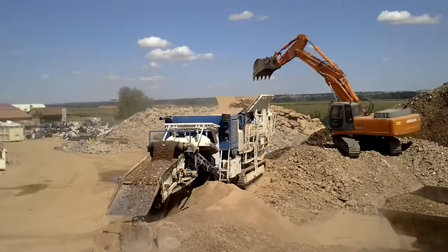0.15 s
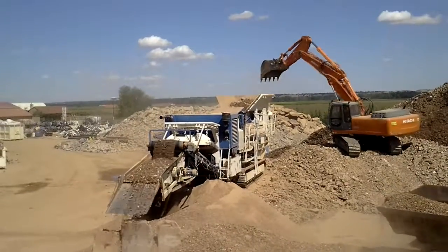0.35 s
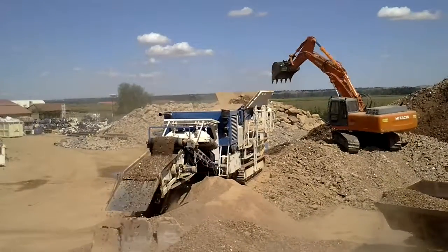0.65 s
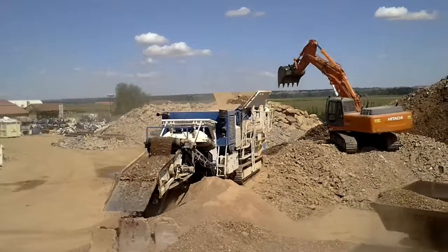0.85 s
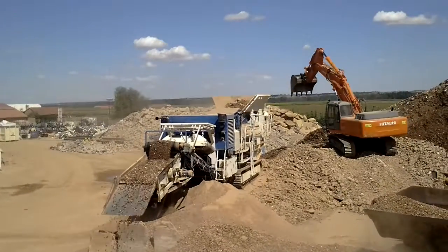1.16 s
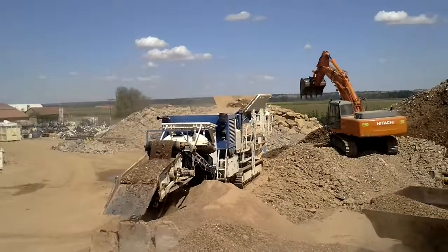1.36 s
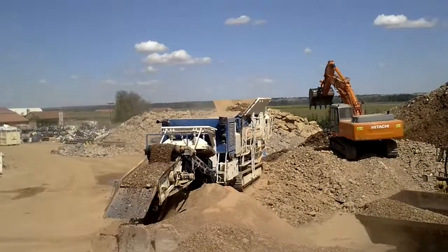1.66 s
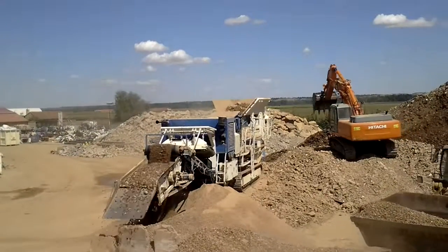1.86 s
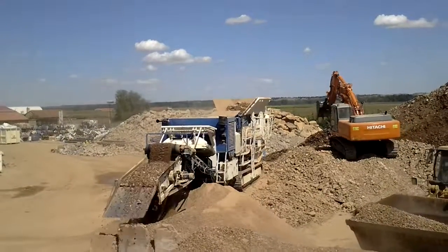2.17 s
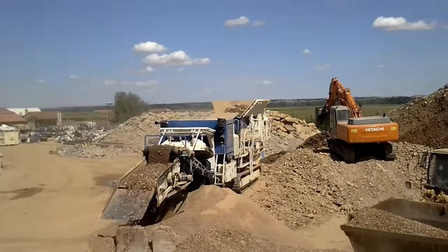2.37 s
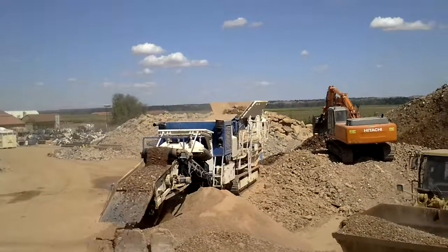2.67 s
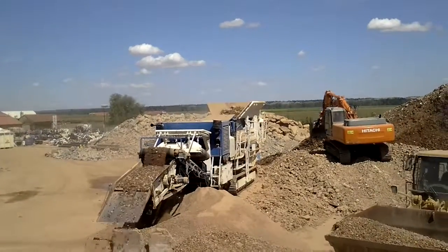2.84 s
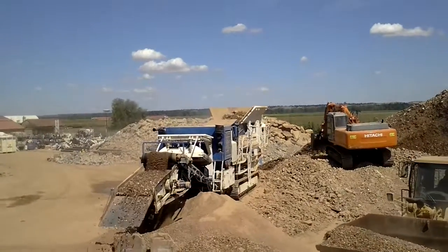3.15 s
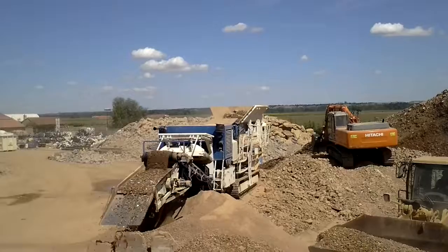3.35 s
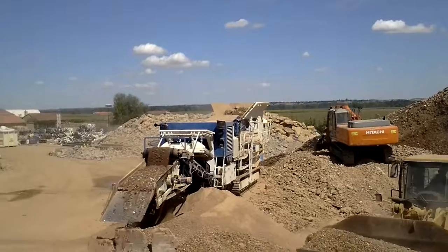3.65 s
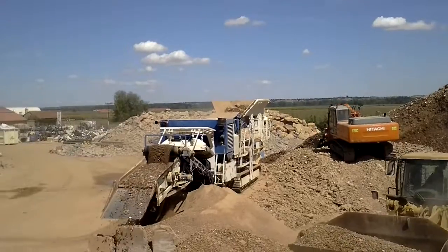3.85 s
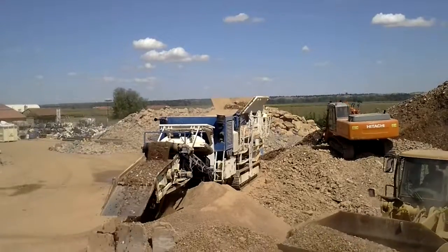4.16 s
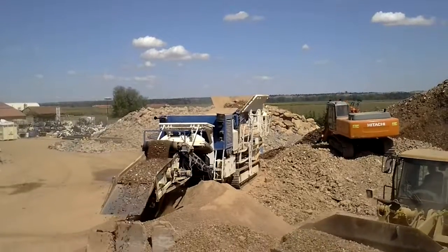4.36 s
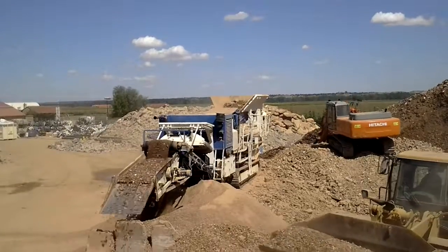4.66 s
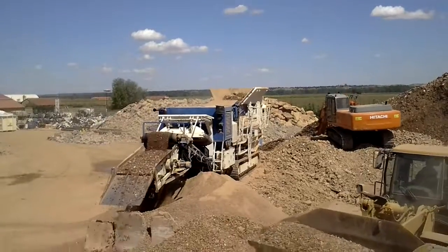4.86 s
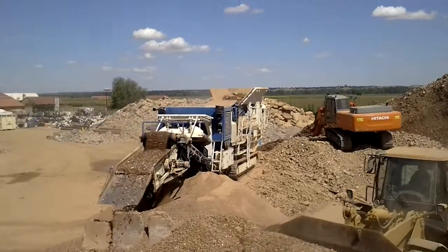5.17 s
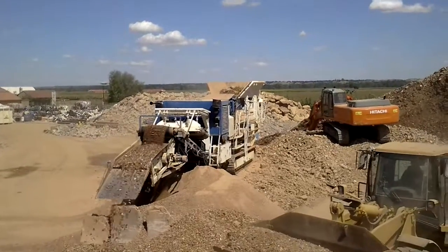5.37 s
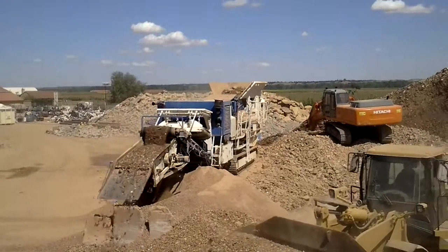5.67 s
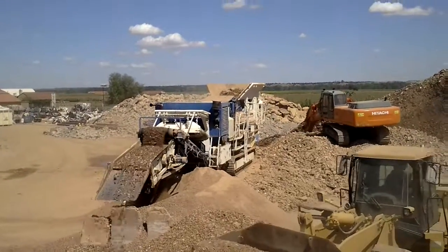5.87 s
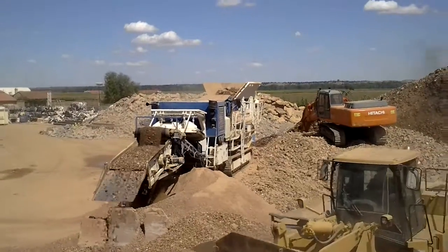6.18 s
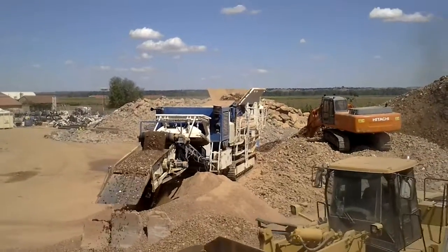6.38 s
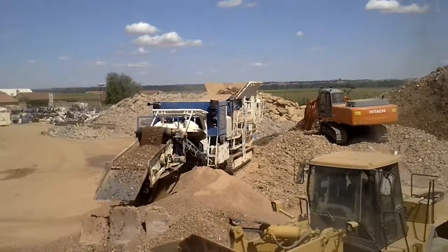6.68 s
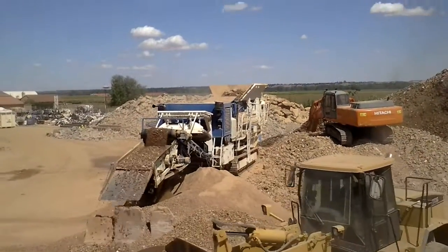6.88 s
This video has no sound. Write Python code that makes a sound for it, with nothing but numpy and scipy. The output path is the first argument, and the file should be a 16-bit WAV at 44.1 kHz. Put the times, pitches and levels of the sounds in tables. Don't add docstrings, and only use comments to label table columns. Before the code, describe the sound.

Steady diesel drone and gear whine under dense stone rattle, hard clacks and dull hopper thumps, with a nearing loader engine and late pump whine.

```python
import sys
import numpy as np
from scipy import signal
from scipy.fft import rfft, irfft
from scipy.io import wavfile
from scipy.ndimage import uniform_filter1d

SR = 44100
rng = np.random.default_rng(int(sys.argv[2]) if len(sys.argv) > 2 else 0)


def transcribe(signal):
    frames = np.atleast_2d(signal).T
    limited = np.clip(frames, -1, 1)
    pcm = np.round(limited * 32767).astype(np.int16)
    wavfile.write(sys.argv[1], SR, pcm)


def gain_from_decibels(decibels):
    exponent = np.asarray(decibels, float) / 20
    return 10 ** exponent


N = 309582
T = np.arange(N) / SR
SLOW = T[::10]
CYCLE_HZ = 13.597
SHADE_HZ = 780

# (time [s], firing rate [Hz], exhaust level [dB], nearness [0-1])
LOADER_PATH = [(0.0, 82, -55.5, 0.5), (1.3, 81.94, -53.5, 0.01), (2.1, 73.1, -52, 0.3), (3.1, 68.9, -43, 0),
               (3.9, 62.3, -50.5, 0.4), (4.499, 52.26, -56, 0.5), (4.901, 52.7, -53, 0.63),
               (5.1, 60.7, -36.5, 0.75), (5.3, 68.8, -45, .7), (5.5, 77.6, -42, 0.6),
               (5.8, 84.2, -46.5, 0.6), (6.099, 89.2, -56.5, .8), (6.499, 89.7, -49, 0.8),
               (7.0, 97, -46.5, 0.84)]
# (frequency [Hz], density [dB per Hz])
DECK_SPECTRUM = [(1500, -20), (2250, -9), (2620, -0.5), (2980, -5.5), (3500, -0.5), (3830, -5), (4050, -4),
                 (4300, -10.5), (4700, -12.5), (5350, -17.5), (5650, -19), (6500, -24), (7000, -27),
                 (7500, -47), (8200, -97.5)]


def evened(x):
    return x / np.sqrt(np.mean(x ** 2) + 1e-20)


def read(points, hz):
    f, value = np.transpose(points)
    return np.interp(np.log(hz + 1), np.log(f + 1), value)


def bump(x, middle, width):
    return np.exp(-.5 * ((x - middle) / width) ** 2)


def add(mix, s, sound):
    part = mix[round(s * SR):][:len(sound)]
    part += sound[:len(part)]


def waver(top_hz, t):
    coarse = np.arange(0, N / SR + .01, .005)
    hz = np.geomspace(top_hz / 20, top_hz, 16)[:, None]
    sines = np.sin(2 * np.pi * (hz * coarse + rng.random((16, 1))))
    return np.interp(t, coarse, evened(sines.sum(0)))


def tone(turns, db, waver_db, blur):
    level = np.sqrt(2) * gain_from_decibels(db + waver_db * waver(5, SLOW))
    return level * np.cos(2 * np.pi * turns + blur * waver(6, SLOW))


def ringing(hz):
    # (mode frequency [Hz], bandwidth [Hz], gain [dB])
    panels = [(580, 14, -3.5), (5070, 130, -3), (1545, 28, 1.5), (1647, 27, 3.5), (1838, 13, 7),
              (2142, 14, 6.5), (2615, 99, 2), (3780, 44, 1), (4140, 260, 2.5), (5320, 210, 3),
              (2495, 90, -2.5), (4800, 150, -3), (4925, 90, 2.5), (5580, 120, -4)]
    return 1 + sum((gain_from_decibels(db) - 1) / (1 + (2 * (hz - f) / width) ** 2) for f, width, db in panels)


def shaped(x, spectrum, moving_db, patchy_db, streaky_db):
    fine_hz = np.fft.rfftfreq(N, 1 / SR)
    x = irfft(rfft(x) * gain_from_decibels(read(spectrum, fine_hz)) * ringing(fine_hz), N)
    hz, t, z = signal.stft(x, SR, nperseg=1024, noverlap=768, boundary="even")

    def drift(bins, frames):
        across = uniform_filter1d(rng.standard_normal(z.shape), size=bins, axis=0)
        return evened(uniform_filter1d(across, size=frames, axis=1))

    patches = drift(8, 12)
    streaks = drift(2, 60)
    z = z * gain_from_decibels(moving_db(np.log2(hz + 1)[:, None], t) + patchy_db * patches + streaky_db * streaks)
    return evened(signal.istft(z, SR, nperseg=1024, noverlap=768)[1][:N])


def nearness(t):
    s, *_, near = np.transpose(LOADER_PATH)
    return np.interp(t, s, near)


def shade_db(octave, t):
    return -13 * np.maximum(nearness(t) - .75, 0) * bump(octave, np.log2(SHADE_HZ), .45)


def groan_db(octave, t):
    # (middle time [s], length [s], gain [dB], pitch of the part [Hz])
    loads = [(0.8, 3.2, 3, 1310), (6.7, 1.2, -3.5, 1320), (6.8, .7, 5, 980), (4.0, 1.4, 4, 440),
             (3.5, 0.92, 2, 600), (0.6, 1.5, 4, 210), (5.4, .6, 2, 1060), (4.3, .6, -2, 950),
             (6.5, .4, 3, 1600), (5.3, .8, 2, 1650), (1.0, 2.4, -1.5, 1040), (3.2, .7, 0.5, 240),
             (2.5, .5, -3, 550), (4.9, .4, -3, 270), (6.5, .5, -3, 230)]
    return sum(db * bump(t, s, length / 2) * bump(octave, np.log2(hz), .07) for s, length, db, hz in loads)


def crusher_hum():
    # (time [s], whine frequency [Hz], whine level [dB])
    drive = [(0.0, 746.4, -29.5), (0.9, 746.6, -29.5), (1.9, 747.2, -28.5), (2.7, 746.6, -29),
             (3.9, 745.8, -31), (4.6, 745.6, -29), (5.3, 745.1, -29.5), (6.3, 743.8, -32),
             (7.0, 742.8, -33)]
    # (order of the four-stroke cycle [1], level [dB])
    engine_orders = [(4, -56), (6, -61.5), (7, -59), (8, -59), (12, -54.5), (13, -46.5), (14, -38),
                     (15, -48), (16, -48), (20, -46.5), (22, -43), (23, -47.5), (24, -36.5), (25, -42.5),
                     (26, -38), (27, -38), (28, -38), (29, -45.5), (30, -41), (31, -46), (34, -44),
                     (36, -46), (38, -50), (40, -48), (42, -45.5), (43, -49), (44, -43.5), (46, -45.5),
                     (47, -43.5), (48, -43)]
    # (frequency [Hz], level [dB])
    shaft_tones = [(33, -61), (35.7, -53.5), (44.4, -58), (296.1, -36.5), (362, -43), (429.3, -45),
                   (500.6, -48), (565, -46), (704, -42.5), (795, -43), (927, -44), (1138, -48),
                   (1247.6, -47), (1285, -42), (1339, -44.5), (1393.6, -50), (1580, -46), (1851, -51)]
    s, whine_hz, whine_db = np.transpose(drive)
    rated_hz = 746.0
    seconds = np.cumsum(np.interp(SLOW, s, whine_hz) / rated_hz) * SLOW[1]
    whine_level = np.interp(SLOW, s, whine_db) - 1.6 + 3.2 * waver(30, SLOW)
    hum = tone(rated_hz * seconds, whine_level, waver_db=.9, blur=0.45)
    for order, db in engine_orders:
        scatter = .1 + .9 * (round(order) % 2) * (order > 16)
        lag = scatter * rng.random()
        hum = hum + tone(round(order) * CYCLE_HZ * seconds + lag, db, waver_db=1.3, blur=0.25)
    for hz, db in shaft_tones:
        shade = 0.58 * shade_db(np.log2(SHADE_HZ), SLOW) * (hz > SHADE_HZ)
        level = db + groan_db(np.log2(hz), SLOW) + shade
        hum = hum + tone(hz * seconds + rng.random(), level, waver_db=3.0, blur=0.69)
    return hum


def loader():
    s, hz, db, _ = np.transpose(LOADER_PATH)
    firing_turns = np.cumsum(np.interp(SLOW, s, hz)) * SLOW[1]
    exhaust = tone(firing_turns, np.interp(SLOW, s, db) - 2.0, waver_db=3.0, blur=.15)
    pump_on = np.clip((SLOW - 6.33) / .15, 0, 1)
    pump = tone(520 * SLOW, -38, waver_db=1.5, blur=.2) * pump_on
    return pump + exhaust


def nearing_db(octave, t):
    fan_db = 9 * nearness(t) * bump(octave, np.log2(2160), 0.2)
    return fan_db + shade_db(octave, t) + groan_db(octave, t)


def roar():
    # (frequency [Hz], density [dB per Hz])
    roar_spectrum = [(27, -52), (34, -22), (60, -21.5), (135, -17), (178, -8), (245, -8.5), (351, -0.5),
                     (513, -11), (736, 0.5), (864, -6.5), (994, -10), (1540, -10), (1960, -20.5),
                     (2400, -26), (3100, -51)]
    wind = gain_from_decibels(-21.5) * shaped(rng.standard_normal(N), roar_spectrum, nearing_db, patchy_db=0.5, streaky_db=1)
    upper = signal.sosfiltfilt(signal.butter(2, [900, 1800], "band", fs=SR, output="sos"), wind)
    lower = signal.sosfiltfilt(signal.butter(2, [270, 450], "band", fs=SR, output="sos"), wind)
    puffs = .17 * lower * np.cos(2 * np.pi * 2 * CYCLE_HZ * T)
    chuffs = .13 * upper * np.cos(2 * np.pi * 4 * CYCLE_HZ * T)
    return wind + puffs + chuffs


def batches_db(octave, t):
    # (middle time [s], length [s], gain [dB], pitch of the
    # part [Hz])
    batches = [(0.089, 1.1, 7.5, 4170), (.25, 0.83, 2.5, 2560), (1.4, 3, -1, 2820), (0.901, 0.35, 0, 4200),
               (2.2, 0.9, 3, 2600), (0.45, 0.27, 1.5, 3320), (0.25, 0.6, 3, 6700), (0.25, 0.4, 2, 6000),
               (1.6, .4, 2.5, 6000), (.65, .3, 3, 5600), (6.2, .3, 3, 5800), (6.25, .25, 2, 5050),
               (6.42, .15, 3, 4500), (2.35, .1, 4, 4900), (1.54, 0.56, 8, 4130), (2.449, 0.89, 3.5, 5440),
               (2.8, 0.16, 3, 3270), (3.323, 0.23, 7.5, 4210), (4.11, 0.61, 2.5, 4990),
               (4.274, 0.57, 3.5, 2690), (4.936, 0.27, 4.5, 2650), (5.039, 0.24, 5, 4520),
               (5.64, 0.2, 4.5, 2770), (5.9, 0.18, 3.5, 3970), (6.173, 0.14, 10.5, 4190),
               (6.19, 0.23, 6.5, 4540), (6.2, 0.48, 5.5, 2900), (6.171, 0.15, 6, 6600),
               (5.7, 0.18, 1.5, 5150), (4.5, 2.4, 0, 4250), (5.7, .15, 2, 4110), (6.73, 0.87, 7, 4200),
               (6.7, .7, 2.5, 3900), (4.994, 1.3, 2, 3390), (4.4, 2, 2.5, 4470), (4.5, 1.8, 2, 5350),
               (4.3, .3, 3, 3500), (2.8, .3, -2, 3000), (6.7, .5, 3.5, 6600), (6.85, .4, 3, 5700),
               (4.6, 1.6, -2, 4330), (5.2, 1.2, 2, 3800)]
    swells = 0
    for s, length, db, hz in batches:
        pitch = np.log2(hz)
        width = 0.12 * np.where(octave < pitch, .5, 1)
        swells = swells + db * bump(t, s, length / 2) * bump(octave, pitch, width)
    echo_oct = 0.058
    comb = bump(octave, np.log2(2860), echo_oct) - bump(octave, np.log2(2500), echo_oct)
    echo_db = 9 * np.clip(nearness(t) - 0.51, 0, .3) * comb
    thinning_db = -6.5 * np.maximum(t - 6.66, 0)
    return swells + echo_db + thinning_db


def rattle():
    clumps = gain_from_decibels(1.0 * waver(40, T))
    sizes = gain_from_decibels(1.8 * np.minimum(rng.exponential(1, N), 4)) * rng.choice([-1., 1.], N)
    blows = sizes * clumps * (rng.random(N) < 2500 / SR)
    blur = rfft(rng.standard_normal(2000) * gain_from_decibels(-60 * T[:2000] / 0.022))
    blur = irfft(blur / abs(blur))
    stones = evened(signal.oaconvolve(blows, blur)[:N]) + 0.92 * rng.standard_normal(N)
    return gain_from_decibels(-27) * shaped(stones, DECK_SPECTRUM, batches_db, patchy_db=0.6, streaky_db=1.1)


def clacks():
    # (time [s], peak level [dB], ring frequency [Hz], relative grit level [dB])
    stones = [(0.4582, -10, 3320, -21), (1.497, -6, 4040, -28.5), (1.5347, -5.5, 4030, -31),
              (1.601, -18, 4000, -16), (1.7314, -11, 4360, -25), (1.789, -15, 2700, -27),
              (2.3322, -13, 3470, -31), (2.492, -13, 3500, -19), (2.931, -11, 4040, -20),
              (3.055, -14, 3800, -19), (3.26, -8.5, 3810, -23), (3.302, -22.5, 2566, -28),
              (3.4125, -10.5, 4050, -22), (4.06, -9, 2580, -34), (4.0926, -11, 2760, -33),
              (4.176, -10, 3960, -21.5), (4.5235, -22, 3350, -15), (4.7515, -8, 2650, -25),
              (4.918, -25, 2600, -20), (4.98, -9, 3920, -25), (5.5603, -11, 2800, -27),
              (5.904, -27, 3230, -18), (6.0112, -4, 3940, -27.5), (6.088, -7.5, 4030, -25),
              (6.183, -10, 3880, -15.5), (6.236, -10, 2850, -28), (6.4298, -6.5, 4040, -22.5),
              (6.622, -0.5, 4000, -33), (6.683, -9, 3750, -22), (6.862, -12, 4130, -24),
              (0.03, -16, 4140, -23), (0.074, -11, 4160, -24), (.1181, -11, 3950, -26),
              (.3072, -19, 4050, -24), (0.3515, -10, 4040, -19), (0.5524, -21, 4170, -19),
              (0.8112, -13, 4230, -21), (1.0804, -18, 4000, -26), (1.1722, -13, 4190, -28),
              (1.3713, -17, 4000, -30), (1.4094, -9, 4220, -21), (1.4557, -10, 3900, -20),
              (5.9477, -14, 4180, -29), (6.056, -10, 3980, -27), (6.135, -12, 4340, -26),
              (6.208, -11, 4200, -21), (6.344, -9, 4280, -25), (6.3915, -14, 4100, -26),
              (6.7873, -12, 4000, -24), (6.5446, -17, 4130, -22)]
    out, t = np.zeros(N), T[:3500]
    hz = np.fft.rfftfreq(len(t), 1 / SR)
    deck = gain_from_decibels(read(DECK_SPECTRUM, hz))
    noises = rng.standard_normal((len(stones), len(t)))
    for (s, db, ring_hz, grit_db), noise in zip(stones, noises):
        ring = np.sin(2 * np.pi * ring_hz * t) * gain_from_decibels(-60 * t / 0.021)
        colour = deck * np.where(hz > 4700, gain_from_decibels(grit_db + 22.0), 1)
        crack = evened(irfft(rfft(noise) * colour, len(t))) * gain_from_decibels(-60 * t / 0.11)
        tumble = gain_from_decibels(0.89 * (grit_db + 18.0))
        onset = 1 - np.exp(-t / 0.0031)
        add(out, s, gain_from_decibels(db - 1.0) * onset * (ring + 0.27 * tumble * crack))
    return out


def thumps():
    # (time [s], peak level [dB], ring frequency [Hz])
    lumps = [
        (.271, -11.5, 738),
        (.978, -21, 706),
        (1.943, -8, 745),
        (2.769, -16, 753),
        (3.117, -19, 734),
        (3.947, -14, 730),
        (5.202, -18, 756),
        (5.949, -14, 740),
        (6.064, -16.5, 733),
        (6.6, -13, 803),
    ]
    out, t = np.zeros(N), T[:4000]
    for s, db, hz in lumps:
        ring = np.sin(2 * np.pi * hz * t) + 0.3 * np.sin(2 * np.pi * 0.58 * hz * t)
        onset = 1 - np.exp(-t / 0.0019)
        add(out, s, gain_from_decibels(db - 60 * t / 0.091) * onset * ring)
    return out


def slides():
    # (time [s], length [s], level [dB], brightness [dB per octave])
    rushes = [
        (0.439, .05, -35, 4),
        (0.899, .07, -30, -2),
        (1.127, 0.018, -29, 9),
        (1.78, 0.049, -27, -3),
        (2.317, 0.061, -27.5, -1),
        (3.252, .09, -30, 0),
        (6.052, 0.38, -31, -1),
        (6.117, 0.15, -32.5, 14),
        (6.142, 0.16, -35, 0),
        (6.479, .012, -29, 3),
    ]
    out = np.zeros(N)
    hz = np.fft.rfftfreq(8000, 1 / SR)
    octaves = np.log2(np.minimum(hz, 5000) / 3500 + 0.0076)
    chute_db = 7.3 * (bump(hz, 1900, 400) + bump(hz, 5000, 790))
    noises = rng.standard_normal((len(rushes), 8000))
    for (s, length, db, tilt_db), noise in zip(rushes, noises):
        colour = gain_from_decibels(read(DECK_SPECTRUM, hz) + tilt_db * octaves + chute_db)
        rush = evened(irfft(rfft(noise) * colour, 8000))[:round(length * SR)]
        add(out, s, gain_from_decibels(db) * rush * signal.windows.tukey(len(rush), .7))
    return out


def ticks():
    # (time [s], peak level [dB], frequency [Hz])
    grit = [
        (5.9398, -24, 6000),
        (5.9546, -29, 6100),
        (6.4915, -27, 5100),
    ]
    out, t = np.zeros(N), T[:200]
    for s, db, hz in grit:
        snap = gain_from_decibels(db + 9.5) * np.sin(2 * np.pi * hz * t) * (t / 0.00009) * np.exp(-t / 0.00025)
        add(out, s, snap)
        add(out, s + .00055, 0.21 * snap)
    return out


def scene():
    tones = signal.resample_poly(crusher_hum() + loader(), 10, 1)[:N]
    return (tones + roar() + rattle() + clacks() + thumps() + slides() + ticks())[None]


def low_pass(x):
    return signal.sosfilt(signal.butter(12, 9150, fs=SR, output="sos"), x)


def record(dry):
    rolled = signal.sosfiltfilt(signal.butter(3, 7300, fs=SR, output="sos"), dry)
    blocks = dict(fs=SR, window="cosine", nperseg=5644, noverlap=2822)
    hz, _, z = signal.stft(rolled, boundary="even", **blocks)
    level_db = 20 * np.log10(abs(z) + 1e-12)
    band_db = uniform_filter1d(level_db, size=9, axis=1)
    top = signal.sosfiltfilt(signal.butter(8, [7800, 9000], "band", fs=SR, output="sos"), rolled)
    snap = np.minimum(8 * uniform_filter1d(1. * (abs(top) > gain_from_decibels(-58)), size=200), 1)
    presence_db = level_db[:, (hz > 3800) & (hz < 4600)].mean(1, keepdims=True)
    masking_db = 0.75 * (presence_db - presence_db.mean())
    weak = (band_db < -86 + masking_db) & (level_db < -81 + masking_db)
    faint = (hz[:, None] > 6400) & weak
    kept = signal.istft(z * ~faint, **blocks)[1][:, :N]
    return low_pass(kept + snap * (rolled - kept))


dry = scene()
out = record(dry)
transcribe(out)
```